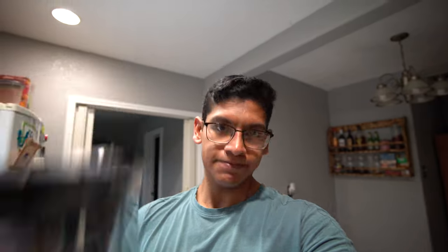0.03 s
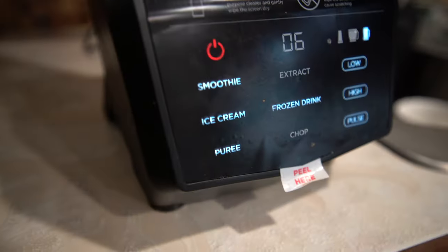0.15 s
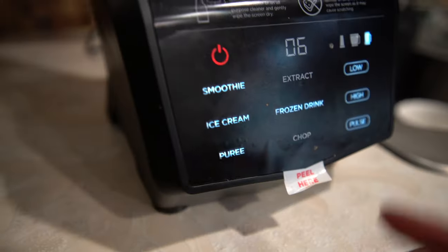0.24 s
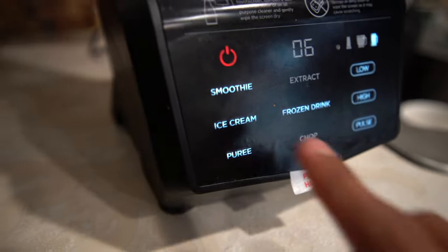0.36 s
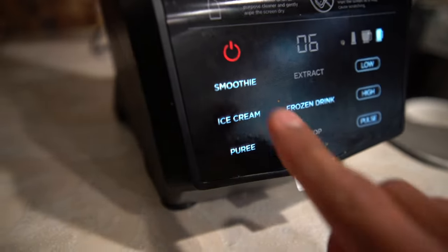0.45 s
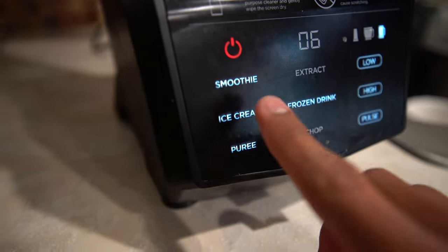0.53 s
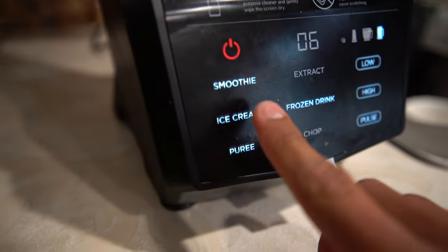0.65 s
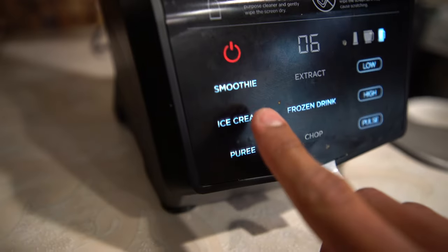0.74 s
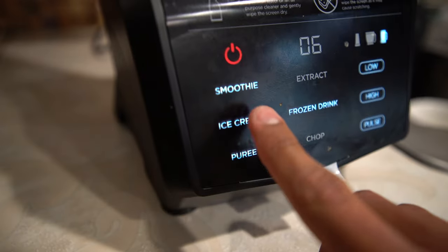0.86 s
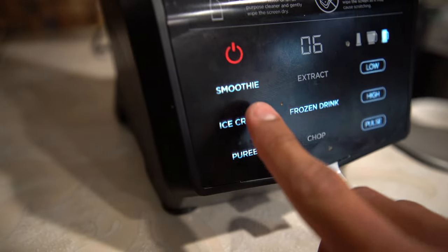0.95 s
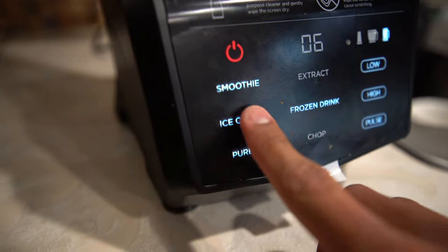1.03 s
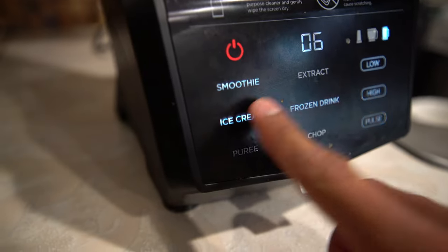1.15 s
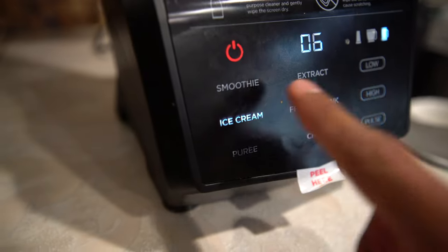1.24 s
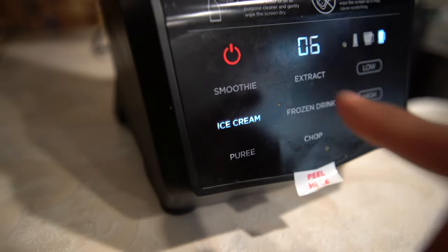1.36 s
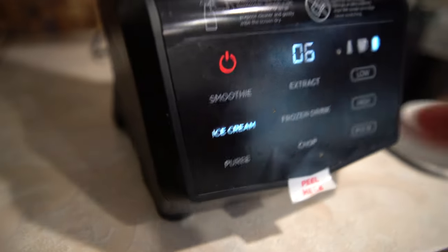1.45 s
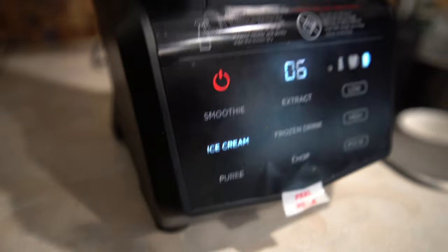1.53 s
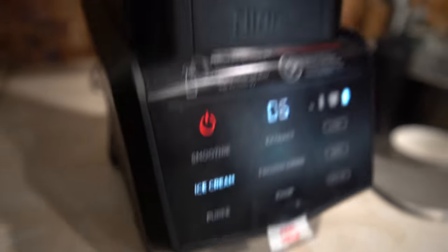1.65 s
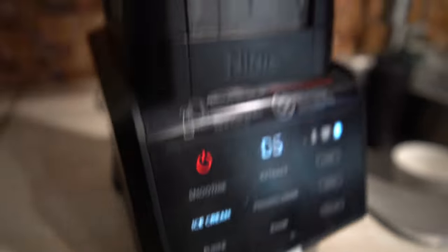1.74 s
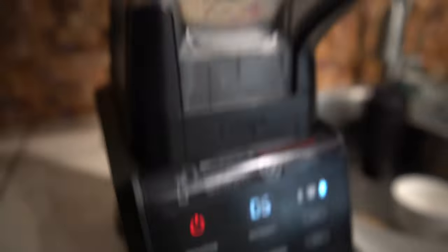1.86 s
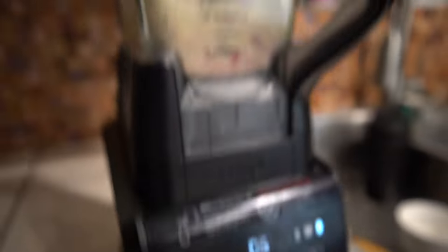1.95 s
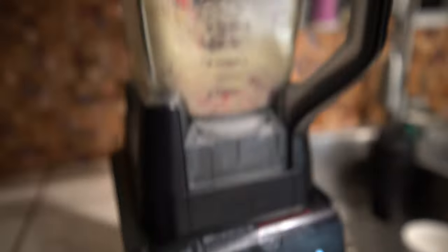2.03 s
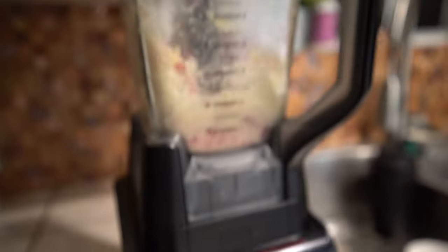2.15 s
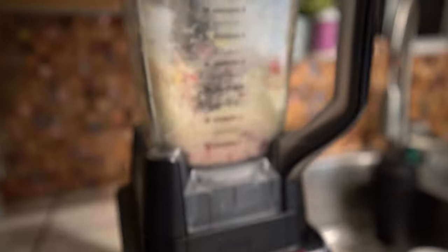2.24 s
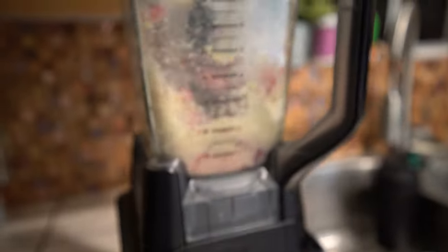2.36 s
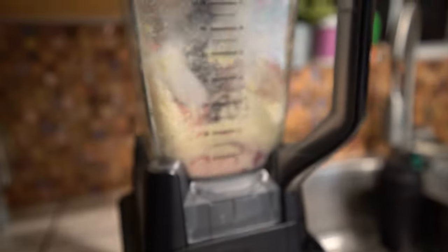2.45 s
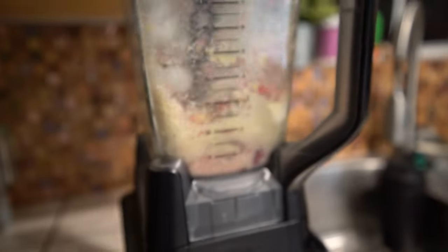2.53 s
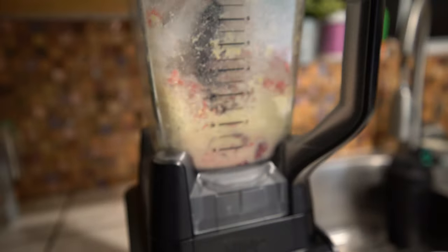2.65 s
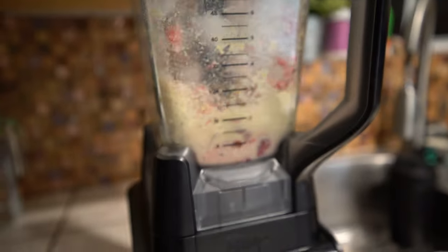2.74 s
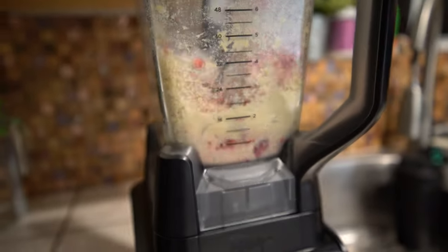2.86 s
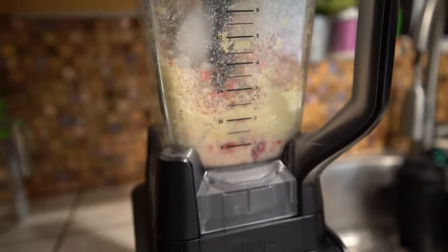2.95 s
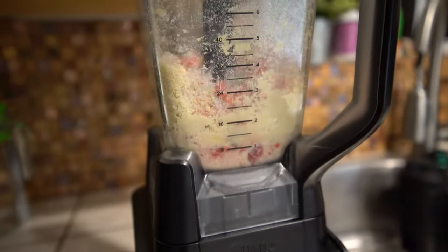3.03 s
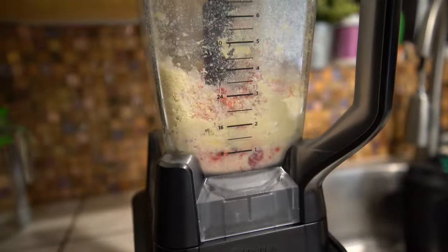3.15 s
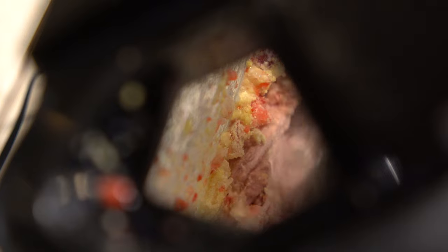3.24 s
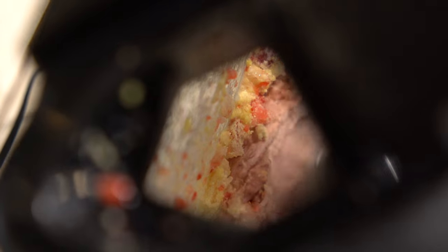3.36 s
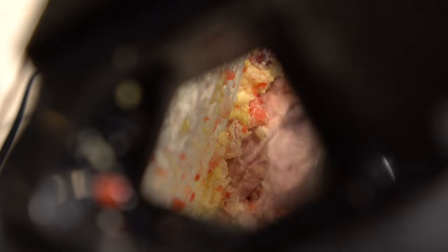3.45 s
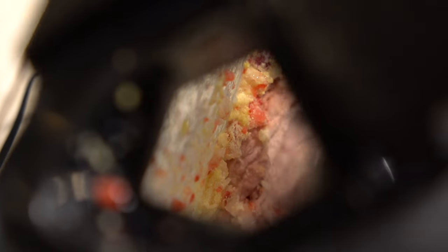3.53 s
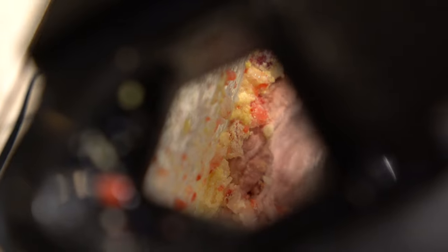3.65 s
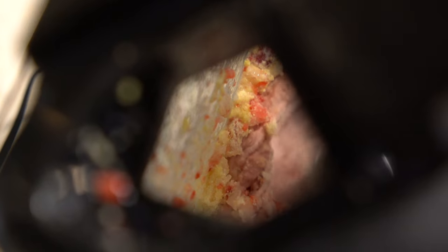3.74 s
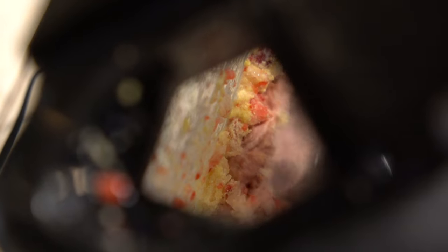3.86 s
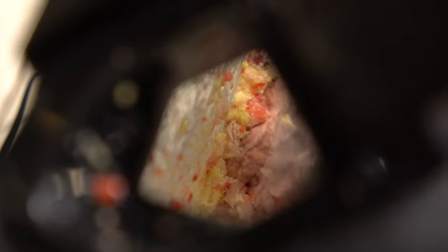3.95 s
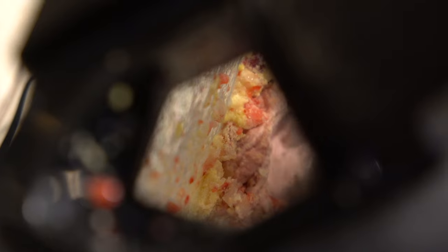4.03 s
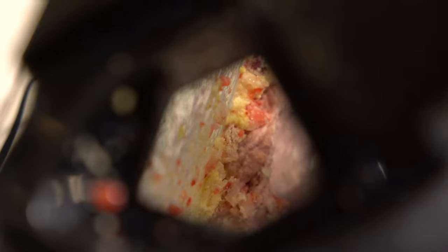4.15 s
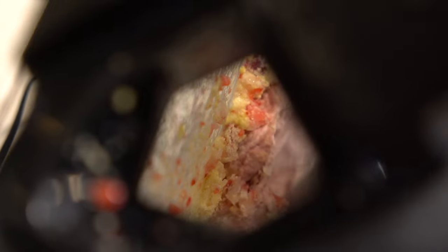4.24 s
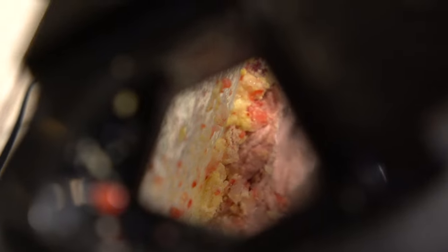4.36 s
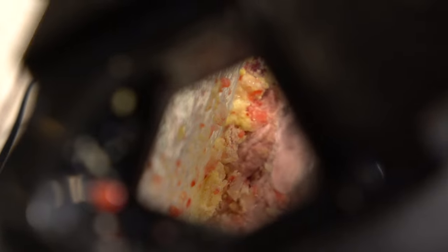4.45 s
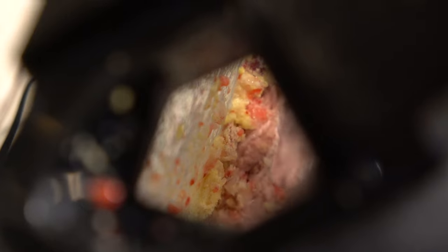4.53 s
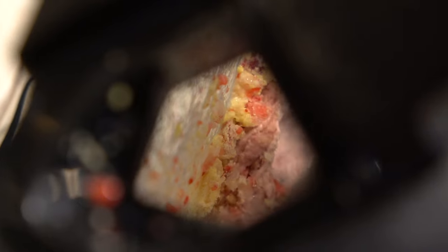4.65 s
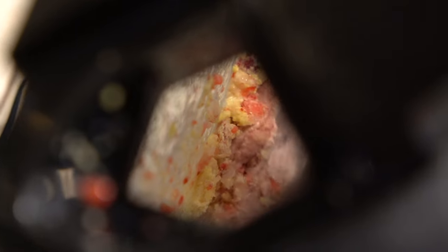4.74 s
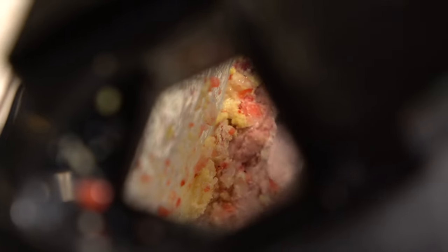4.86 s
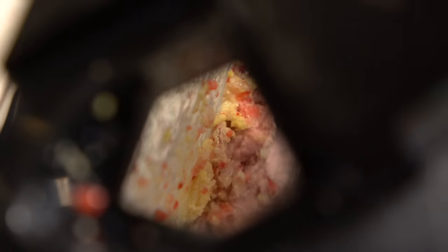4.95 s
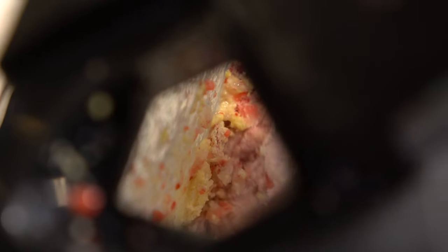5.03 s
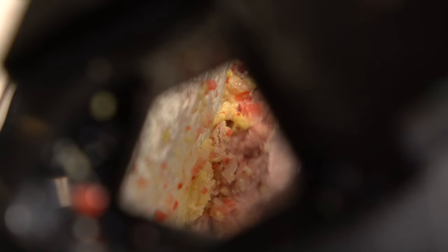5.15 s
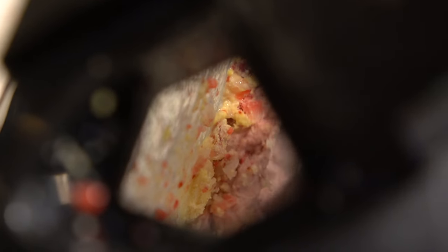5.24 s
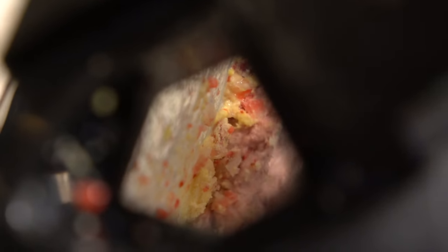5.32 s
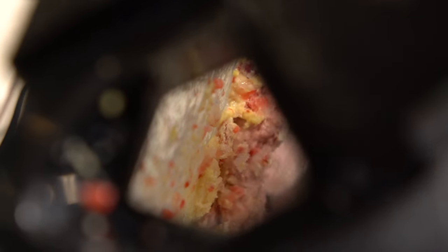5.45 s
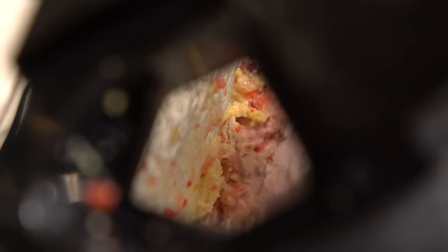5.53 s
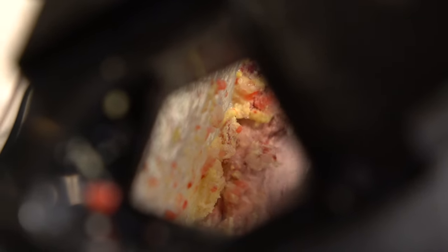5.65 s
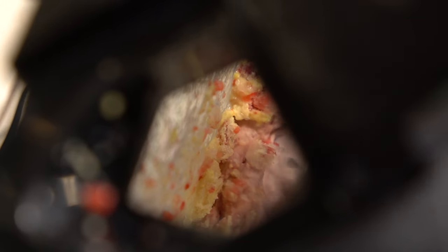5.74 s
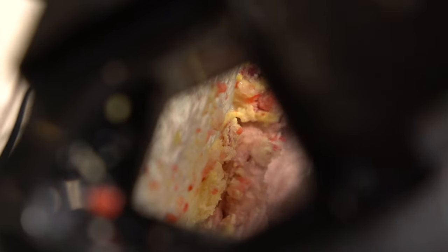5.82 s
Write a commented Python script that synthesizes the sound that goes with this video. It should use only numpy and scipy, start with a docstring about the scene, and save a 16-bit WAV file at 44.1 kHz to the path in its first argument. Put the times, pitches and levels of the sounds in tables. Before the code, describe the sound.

A click, then a kitchen blender violently crushes ice for under two seconds before cutting to a quieter, airy motor whir and throbbing hum.

```python
"""Blender crushing ice, from beside the jar and from above the spout

A relay clicks and the motor starts. Blades strike ice as damped sines and bursts of noise; coloured grains
give chips and tumbling lumps, and a shaft harmonic drives the jar's howl. Then, from above the open spout,
filtered noise gives rushing motor air, with gear whine and the throbbing hum of blades in thick slush.
A quiet kitchen lies beneath, with an opening hiss, thumps, taps and clicks."""
import sys
import numpy as np
from scipy import signal
from scipy.fft import rfft, irfft
from scipy.io import wavfile
from scipy.ndimage import uniform_filter1d

SR = 44100
rng = np.random.default_rng(int(sys.argv[2]) if len(sys.argv) > 2 else 0)


def bounce(signal):
    """Save signal as a 16-bit WAV file at the path given by the first command-line argument."""
    frames = np.transpose(np.atleast_2d(signal))
    limited = np.clip(frames, -1, 1)
    pcm = np.round(limited * 32767).astype(np.int16)
    wavfile.write(sys.argv[1], SR, pcm)


N = 259749
T = np.arange(N) / SR  # time in seconds

# Hardest blows of a blade on ice. Each row: start in seconds, relative thud level in dB,
# thud pitch in Hz, relative crack level in dB.
STRIKES = [(1.3339, -26.5, 925, -26), (1.3899, -17.5, 1000, -23), (1.423, -7, 800, -27),
           (1.4707, -8, 850, -1.5), (1.5386, -17, 930, -13.5), (1.6077, -8, 710, -19),
           (1.6154, -7.5, 1010, -11), (1.7003, -8, 926, -8), (1.7657, -3, 683, -2.5),
           (1.8643, -11, 655, -9), (1.886, -7.5, 600, -8), (1.9192, -16, 864, -13),
           (1.9415, -19, 612, -11.5), (1.9675, -13, 930, -9), (2.0114, -7, 860, -7.5),
           (2.1077, -13.5, 860, -16), (2.2031, -4, 846, -14), (2.2187, -8, 610, -20),
           (2.3532, -14, 620.4, -21), (2.3864, -11.5, 615, -10.5), (2.4317, -32, 890, -8),
           (2.4648, -12, 1035, -13), (2.5077, -17, 1110, -5), (2.5972, -19.5, 1347, -8),
           (2.6705, -12, 900, -10.5), (2.6986, -17, 830, -14), (2.7239, -7, 864, -13.5),
           (2.7805, -16.5, 640, -10), (2.858, -13.5, 660, -11.5), (2.893, -19, 824, -26),
           (2.9286, -20, 900, -19), (2.9785, -27, 760, -18), (3.0326, -17.5, 896, -41),
           (3.0804, -20, 913, -41)]
# Last hard bits flung at the wall, heard through the spout. Each row: start in seconds,
# relative thud level in dB, thud pitch in Hz, relative crack level in dB.
WALL_BITS = [(3.971, -33, 696, -27), (3.9883, -25, 1000, -14), (4.23, -44, 1221, -21.5),
             (4.302, -42, 1210, -16.5), (4.873, -24, 613, -30)]
# Spectrum of the thin, bright crack of those bits. Each row: frequency in Hz, level in dB.
BIT_COLOUR = [(500, -16), (2000, -10), (3500, 0.5), (5500, 1), (8000, -12), (11000, -19), (16000, -17)]
# Resonant modes of the jar. Each row: frequency in Hz, width in Hz, relative level in dB.
JAR_MODES = [(357, 40, -8), (433, 23, -2.5), (460, 70, 6.5), (720, 170, -3.5), (900, 55, 1), (1170, 70, -4),
             (1230, 74, -24), (1820, 150, -13), (2154, 110, -2), (2390, 67, -5)]
# Spectra of cracking ice, sprayed chips, sharp snaps and tumbling lumps.
# Each row: frequency in Hz, level in dB.
CRACK_COLOUR = [(200, -65), (700, 2.5), (1500, 1), (2500, -2), (3600, -5), (5000, -7.5), (6300, -13),
                (7500, -14.5), (12000, -14), (16000, -22)]
CHIP_COLOUR = [(300, -12.5), (1000, -8), (1700, -1.5), (2400, 2), (3500, -2.5), (4700, -11.5),
               (6200, -10.5), (7500, -20), (11000, -26.5), (16000, -35)]
SNAP_COLOUR = [(500, -15), (2500, 3.5), (5000, 7), (8000, -3), (13000, -1), (16000, -29)]
LUMP_COLOUR = [(25, -35), (90, -7), (180, -3), (260, -0.5), (380, 4.5), (560, 3.5), (720, -1), (900, 10.5),
               (1100, 6.5), (1350, 3.5), (1800, 0), (4000, -32)]
# Ice on the blades; coarse ice makes the jar howl, fine ice sprays chips.
# Each row: time in seconds, load in dB, coarseness in dB.
ICE = [(1.32, -18.5, 3), (1.37, -12, 5.5), (1.41, 2, 4), (1.53, 4, 3.5), (1.8, -0.5, 2.5), (2.28, -1, -5),
       (2.55, -1.5, 1.5), (2.9, -4, -0.5), (2.98, -14.5, 3), (3.07, -10, 7), (3.12, -24.5, 4)]
# Spectrum of the motor air. Each row: frequency in Hz, level in dB.
AIR_COLOUR = [(130, -63), (220, -11), (369, -11), (456, -5), (596, -13), (867, -13), (982, -9),
              (1530, -11.5), (1800, -8), (2390, -5), (4790, -15.5), (6140, -13.5), (7470, -25),
              (9580, -25.5), (15500, -37.5)]
# Housing resonances rung by the air. Each row: frequency in Hz, width in Hz, relative level in dB.
HOUSING_MODES = [(527, 120, -5), (1017, 120, -6), (1380, 28, 1), (1803, 50, 2.5), (2110, 21, -10),
                 (2410, 41, 0), (3300, 13, -15), (3480, 24, 4), (5040, 47, -20), (6200, 270, -4),
                 (8400, 270, -12), (9450, 140, 1.5)]
# Gear and shaft tones. Each row: multiple of the shaft rate, relative level in dB.
GEARS = [(1, -18.5), (2, -25), (4, -35), (6, -19), (7, -26.5), (8, -9.5), (9, -15.5), (18, -20),
         (32, -20.5), (38, -14.5), (41, -9.5), (42, -14)]
# Gain of the running motor as heard above the spout. Each row: time in seconds, gain in dB.
SPOUT = [(2.95, -59), (3.17, -35.5), (3.64, -21), (4.1, -20.5), (5.65, -22), (5.89, -25)]
# Slush slumps onto the blades, sloshes and slows the shaft. Each row: centre in seconds, weight 0 to 1.
SLUMPS = [(3.809, 0.58), (3.98, 0.99), (4.449, 0.63), (4.741, 0.73), (5.16, .35), (5.492, 0.75),
          (5.701, 0.36)]
# Blades bite into slush (the hum swells) or spin in an air pocket (it drops).
# Each row: centre in seconds, half length in seconds, change of hum in dB.
BITES = [(3.133, 0.057, -13), (3.23, 0.035, 4.5), (3.51, 0.023, -13), (3.76, 0.14, 4.5), (4.185, .04, -6.5),
         (4.762, .014, -22), (4.824, 0.0079, 7.5), (5.169, .028, 10), (5.365, 0.029, -11.5),
         (5.757, 0.016, -12)]
# Spectra of the kitchen at rest and of the opening hiss. Each row: frequency in Hz, level in dB.
KITCHEN_COLOUR = [(25, -9.5), (45, -19), (75, -37), (110, -14.5), (140, -43), (210, -32), (350, -28.5),
                  (480, -37), (700, -41.5), (1100, -44), (2000, -53), (5000, -59.5), (15000, -78)]
HISS_COLOUR = [(88, -46), (150, -5), (337, -4), (401, -8), (556, -4), (674, -13.5), (3750, -26.5),
               (4210, -30), (15000, -45)]
# Low thumps. Each row: start in seconds, pitch in Hz, level in dB, decay in seconds.
THUMPS = [(.002, 18.4, -18, 0.046), (0.077, 55, -25, 0.02), (0.15, 59.3, -26, 0.047),
          (0.192, 31, -28.5, 0.06)]
# Sharp clicks, the last one the motor relay. Each row: start in seconds, relative level in dB,
# decay in seconds.
CLICKS = [(.106, -23.5, 0.00041), (.512, -66, .008), (1.2945, -27, 0.0096)]
# Spectrum of the clicks. Each row: frequency in Hz, level in dB.
CLICK_COLOUR = [(100, 15), (1400, 4), (2500, -3), (5000, -10), (9000, -13), (16000, -13)]
# Light taps. Each row: start in seconds, relative level in dB.
TAPS = [(.149, -48), (.171, -44), (.178, -47)]
# Brief ringing of the tapped body. Each row: frequency in Hz, width in Hz, relative level in dB.
TAP_MODES = [(950, 400, -4), (1450, 200, 6), (2400, 400, -11), (3600, 500, -17)]

# lesser blows come by chance and follow the load
GLANCES_PER_S, GLANCES_END_S = 24, 2.95
GLANCE_THUD_DB, GLANCE_CRACK_DB, GLANCE_SPREAD_DB = -18, -21.5, 3
GLANCE_HZ, GLANCE_SPREAD_OCTAVES = 870, 0.314
# crushed ice, before the load
HOWL_DB, LUMPS_DB, CHIPS_DB, SNAPS_DB = -17, -19, -18.5, -32
LUMPS_PER_COARSE = 0.22  # dB of tumbling per dB of coarseness
CHURN_DB, CHURN_HZ = 1.5, 27.83  # the ice reaches the blades in uneven heaps
HOWL_WAVER = 0.93  # radians; ice on the blades turns the shaft unevenly
# the shaft runs up, overshoots until the ice takes hold, then wanders a little
START_S, SPIN_UP_S, SHAFT_HZ, WANDER_HZ = 1.305, 0.018, 57.55, 0.45
OVERSHOOT_HZ, OVERSHOOT_S = 4, 0.13
# blade hum and sloshing, before the spout gain
HUM_DB, THROB_DB, SLOSH_DB = 2, 3, -12.5
SLUMP_S, SLUMP_DB, SAG_HZ = 0.045, -1, 3.5
# the windings hum at four times the mains, loudest while the motor starts
WINDING_DB, INRUSH_DB, INRUSH_S = -32.5, 12, 0.15
KITCHEN_DB, HISS_DB, TAP_S = -51.5, -45.5, 0.0036
TOP_HZ = 15800


def strikes(table, crack_colour, knock_db, knock_s, jar_db, crack_db, crack_s, splinter_s, splinter_db):
    """Impact excitation: a lump thuds at its own pitch, shoves the ringing jar, cracks and splinters."""
    knocks, shoves, cracks = np.zeros(N), np.zeros(N), np.zeros(N)
    t = T[:SR // 10]
    for s, thud_db, hz, snap_db in table:
        grit, scrape = rng.standard_normal((2, len(t)))
        side = rng.choice([-1, 1])
        thud = (np.sin(2 * np.pi * hz * t) + 0.17 * unit(resonate(scrape, hz, hz))) * np.exp(-t / knock_s)
        add(knocks, s, side * amp(thud_db) * thud)
        shove = np.exp(-t / 0.000083) + 0.052 * scrape * np.exp(-t / 0.0064)
        add(shoves, s, side * amp(thud_db) * shove)
        # the fracture grows for an instant, and a second piece gives way a few milliseconds later
        splinter_hz = 1800 * 3 ** rng.random()
        later_s = rng.uniform(0.002, 0.007)
        grit = unit(grit + 2.7 * resonate(grit, splinter_hz, splinter_hz / 3))
        first = t / crack_s * np.exp(1 - t / crack_s)
        second = 0.5 * np.exp(-np.abs(t - later_s) / crack_s)
        splinters = amp(splinter_db) * np.exp(-t / splinter_s)
        add(cracks, s, amp(snap_db) * grit * (first + second + splinters))
    jar = amp(jar_db) * ring(shoves, JAR_MODES)
    return amp(knock_db) * knocks + jar + amp(crack_db) * colour(cracks, crack_colour)


def glances():
    """Random excitation: rows of lesser blows, their level following the load of ice on the blades."""
    s, load_db, _ = np.transpose(ICE)
    chance = rng.standard_normal((128, 3))
    times = s[0] + (np.arange(len(chance)) + rng.random(len(chance))) / GLANCES_PER_S
    load = np.interp(times, s, load_db)
    thud_db = load + GLANCE_THUD_DB + GLANCE_SPREAD_DB * chance[:, 0]
    crack_db = load + GLANCE_CRACK_DB + GLANCE_SPREAD_DB * chance[:, 1]
    hz = GLANCE_HZ * 2 ** (GLANCE_SPREAD_OCTAVES * chance[:, 2])
    return np.column_stack([times, thud_db, hz, crack_db])[times < GLANCES_END_S].tolist()


def crushing(turns):
    """Granular noise and resonance: ice tumbles and sprays; the gears meet the jar's main mode and it howls."""
    load, coarse = gains(ICE)
    fine, = gains([(s, -db) for s, _, db in ICE])
    howl_gain = load * coarse * amp(CHURN_DB * walk(CHURN_HZ))
    lump_gain = load * coarse ** LUMPS_PER_COARSE * amp(CHURN_DB * walk(CHURN_HZ))
    chip_gain = load * fine * amp(CHURN_DB * walk(CHURN_HZ))
    surge = amp(1.2 * walk(110)) * (1 + 0.1 * np.sin(2 * np.pi * turns))
    lumps = unit(surge * colour(grains(500, spread_db=1.5, decay_s=0.0026), LUMP_COLOUR))
    chips = unit(surge * colour(grains(1000, spread_db=3, decay_s=0.0022), CHIP_COLOUR))
    snaps = unit(colour(grains(120, spread_db=2.5, decay_s=0.0006), SNAP_COLOUR))
    # eight times the shaft rate lies on the jar's main mode
    whine = np.sin(2 * np.pi * 8 * turns + HOWL_WAVER * walk(28)) * amp(3 * walk(45))
    rough = unit(resonate(surge * noise(), 450, 80))
    howl = unit(unit(resonate(whine, 461, 60)) + 0.65 * rough)
    jar = amp(HOWL_DB) * howl_gain * howl + amp(LUMPS_DB) * lump_gain * lumps
    return jar + chip_gain * (amp(CHIPS_DB) * chips + amp(SNAPS_DB) * snaps)


def shaft(slump):
    """Phase as integrated speed: turns made through run-up, overshoot, wander and the sag of each slump."""
    age = np.maximum(T - START_S, 0)
    run_up = 1 - np.exp(-age / SPIN_UP_S)
    overshoot = OVERSHOOT_HZ * np.exp(-age / OVERSHOOT_S)
    speed = run_up * (SHAFT_HZ + overshoot + WANDER_HZ * walk(7) - SAG_HZ * slump)
    return np.cumsum(speed) / SR


def motor(turns):
    """Turbulence and harmonics: air noise rings the housing over wavering multiples of the shaft rate."""
    gusts = noise() * amp(0.69 * walk(150))
    rush = colour(gusts + 0.44 * grains(300, spread_db=0.5, decay_s=0.0015), AIR_COLOUR)
    air = unit(rush + 0.79 * ring(rush, HOUSING_MODES))
    wobble = 0.0086 * walk(16)  # the load twists the shaft by a fraction of a turn
    tones = sum(amp(db + 2.5 * walk(12)) * np.sin(2 * np.pi * k * (turns + wobble)) for k, db in GEARS)
    return amp(0.96) * air + tones


def slush(turns, slump):
    """Blade-passing tone: three pulses a turn pump the jar's air and throb; slumping slush adds sloshing."""
    hum_gain = amp(HUM_DB + sum(db * bell(s, half_s) for s, half_s, db in BITES))
    slosh_gain = amp(SLOSH_DB) + amp(SLUMP_DB) * slump
    blades = np.sin(2 * np.pi * 3 * turns + 0.3 * walk(14)) * amp(THROB_DB * walk(30))
    cavity = unit(resonate(resonate(noise(), 152, 52), 167, 50))
    hum = unit(unit(blades) + 0.2 * cavity)
    swirl = np.sin(2 * np.pi * 2 * turns + 1.1 * walk(25))
    wash = unit(resonate(resonate(noise(), 106, 61), 128, 72))
    return hum_gain * hum + slosh_gain * unit(swirl + 0.5 * wash)


def windings():
    """Magnetic hum: strong with the starting current, gone once the listener is above the spout."""
    inrush = amp(INRUSH_DB * np.exp(-np.maximum(T - START_S, 0) / INRUSH_S))
    near = np.interp(T, [START_S, START_S + 0.025, 2.8, 3.12], [0, 1, 1, 0])
    return amp(WINDING_DB) * inrush * near * np.sin(2 * np.pi * 240 * T + 0.77 * walk(24))


def walls(x, decay_s, db):
    """Reverberation: dense reflections of the kitchen as decaying noise, a few milliseconds late."""
    t = T[:SR // 3]
    response = rng.standard_normal(len(t)) * np.exp(-t / decay_s) * (t > 0.004)
    return amp(db) * signal.fftconvolve(x, response / np.linalg.norm(response))[:N]


def kitchen():
    """Background noise and transients: room tone, rumble, opening hiss, thumps, clicks and light taps."""
    room = amp(KITCHEN_DB) * unit(colour(noise(), KITCHEN_COLOUR))
    rumble = amp(-40.5) * np.sin(2 * np.pi * 14 * T + 1.0 * walk(3.71))
    hum = amp(-53.0) * np.sin(2 * np.pi * 59 * T)
    hiss = amp(HISS_DB) * unit(colour(noise(), HISS_COLOUR)) * (T < 0.107)
    thumps, clicks, taps = np.zeros(N), np.zeros(N), np.zeros(N)
    t = T[:SR // 2]
    for s, hz, db, decay_s in THUMPS:
        add(thumps, s, amp(db) * np.sin(2 * np.pi * hz * t) * np.exp(-t / decay_s))
    for s, db, decay_s in CLICKS:
        add(clicks, s, amp(db) * rng.standard_normal(len(t)) * np.exp(-t / decay_s))
    for s, db in TAPS:
        add(taps, s, amp(db) * rng.standard_normal(len(t)) * np.exp(-t / TAP_S))
    return room + rumble + hum + hiss + thumps + colour(clicks, CLICK_COLOUR) + ring(taps, TAP_MODES)


def amp(db):
    """Logarithmic level: decibels to gain."""
    return 10 ** (np.asarray(db) / 20)


def unit(x):
    """Normalisation: scale to rms 1."""
    return x / np.sqrt(np.mean(x ** 2) + 1e-20)


def noise():
    """White noise: independent Gaussian samples of rms about 1."""
    return rng.standard_normal(N)


def gains(table):
    """Envelopes: the dB columns of a curve as gains, fading quickly outside its span."""
    s, *columns = np.transpose(table)
    outside_s = np.maximum(s[0] - T, 0) + np.maximum(T - s[-1], 0)
    inside = np.exp(-outside_s / 0.0043)
    return [inside * amp(np.interp(T, s, column)) for column in columns]


def bell(s, half_s):
    """Gaussian envelope: a smooth rise and fall around time s, peak 1."""
    return np.exp(-((T - s) / half_s) ** 2)


def walk(rate):
    """Random modulation: smooth chance with about `rate` new values a second, rms 1."""
    points = rng.standard_normal(4096)
    return unit(uniform_filter1d(np.interp(T * rate, np.arange(len(points)), points), size=64))


def colour(x, points):
    """Minimum-phase filtering: a causal filter with the given (Hz, dB) spectrum."""
    hz, db = np.transpose(points)
    size = 8192
    f = np.maximum(np.arange(size // 2 + 1) * SR / size, 1)
    cepstrum = irfft(np.log(amp(np.interp(np.log(f), np.log(hz), db))))
    # folding the cepstrum forward in time makes the filter causal
    cepstrum[1:size // 2] *= 2
    cepstrum[size // 2 + 1:] = 0
    return signal.fftconvolve(x, irfft(np.exp(rfft(cepstrum))))[:N]


def resonate(x, hz, width):
    """Simple resonance: a second-order peak with gain 1 at its centre."""
    return signal.lfilter(*signal.iirpeak(hz, hz / width, fs=SR), x)


def ring(x, modes):
    """Modal superposition: a body as the sum of several resonances."""
    return sum(amp(db) * resonate(x, hz, width) for hz, width, db in modes)


def grains(rate, spread_db, decay_s):
    """Shot noise: random impacts, mostly small, a few large, each a short decaying burst."""
    size = amp(spread_db * np.minimum(rng.exponential(size=N), 4))
    hits = (rng.random(N) < rate / SR) * size ** 2
    power = signal.lfilter([1], [1, -np.exp(-2 / (decay_s * SR))], hits)
    return unit(np.sqrt(power) * noise())


def add(track, s, sound):
    """Superposition: mix a sound in at time s."""
    i = max(int(s * SR), 0)
    track[i:i + len(sound)] += sound[:N - i]


def scene():
    """Common drive and superposition: one shaft drives everything; the kitchen walls answer the blows."""
    slump = sum(weight * bell(s, SLUMP_S) for s, weight in SLUMPS)
    turns = shaft(slump)
    ice = strikes(STRIKES + glances(), CRACK_COLOUR, knock_db=6.0, knock_s=0.0062, jar_db=30.5,
                  crack_db=10.0, crack_s=0.00065, splinter_s=0.0045, splinter_db=-12.5)
    bits = strikes(WALL_BITS, BIT_COLOUR, knock_db=8, knock_s=0.0045, jar_db=31,
                   crack_db=10.5, crack_s=0.00063, splinter_s=0.0042, splinter_db=-15.5)
    blows = ice + bits
    echoes = walls(blows, decay_s=0.047, db=-12)
    spout, = gains(SPOUT)
    running = spout * (motor(turns) + slush(turns, slump))
    return (crushing(turns) + windings() + blows + echoes + running + kitchen())[None]


def record(dry):
    """Saturation and compression: peaks overload, loud stretches are pulled down fast, the top is cut."""
    clipped = dry / (1 + dry ** 6) ** (1 / 6)
    pole = np.exp(-1 / (0.0084 * SR))
    loudness = np.sqrt(signal.lfilter([1 - pole], [1, -pole], clipped ** 2))
    gain = np.maximum(loudness / 0.3, 1) ** -0.6
    top_cut = signal.ellip(12, 0.1, 80, TOP_HZ, fs=SR, output="sos")
    return signal.sosfilt(top_cut, clipped * gain)


dry = scene()
out = record(dry)
bounce(out)
```